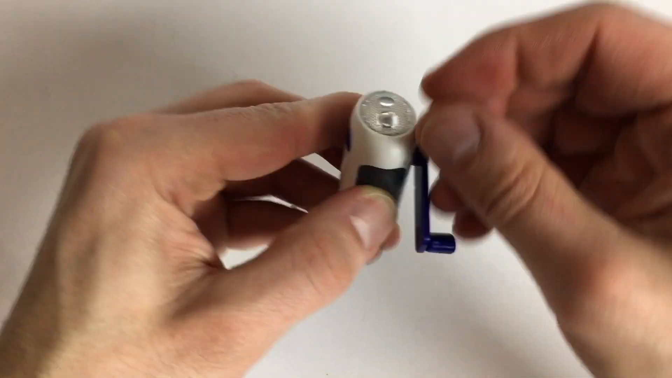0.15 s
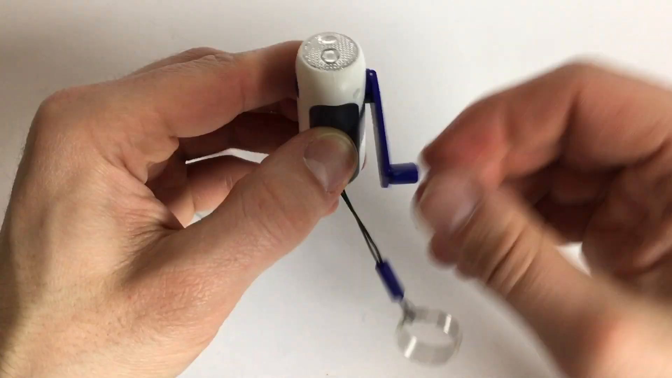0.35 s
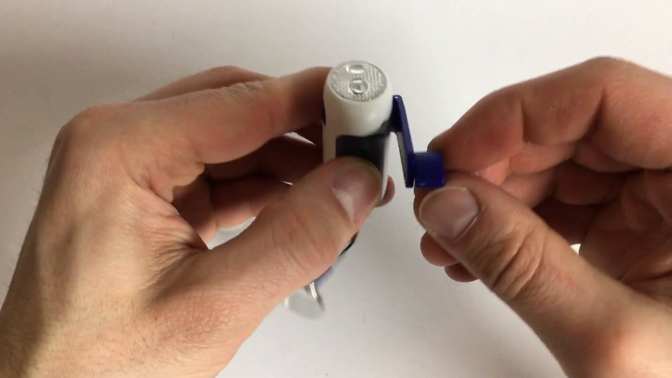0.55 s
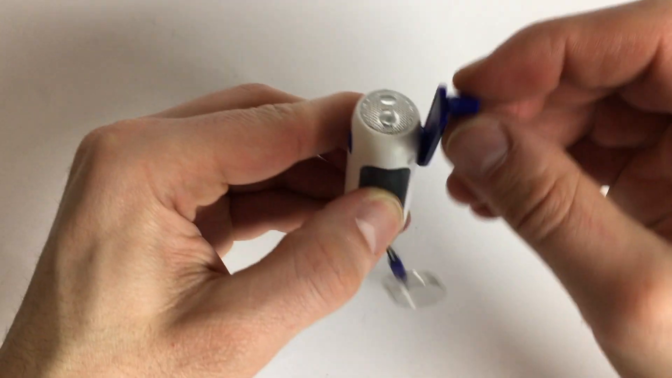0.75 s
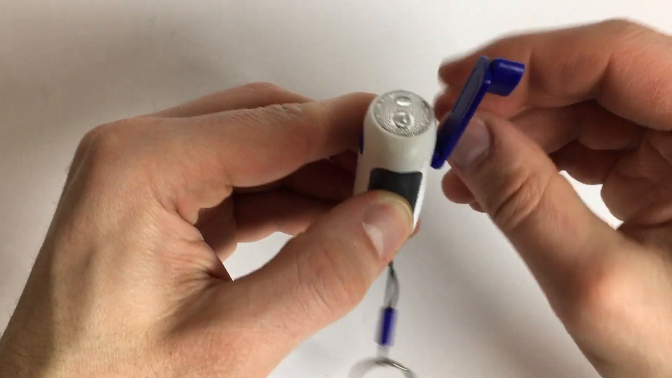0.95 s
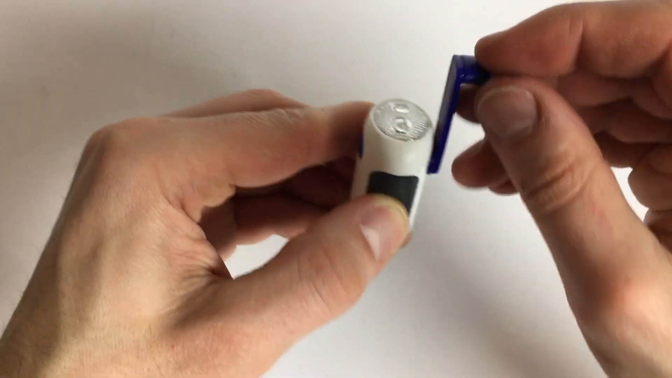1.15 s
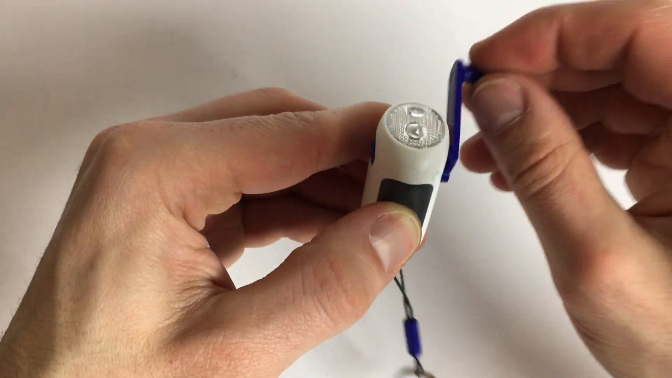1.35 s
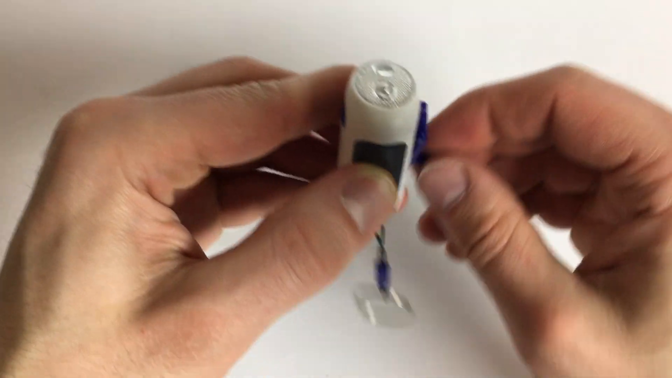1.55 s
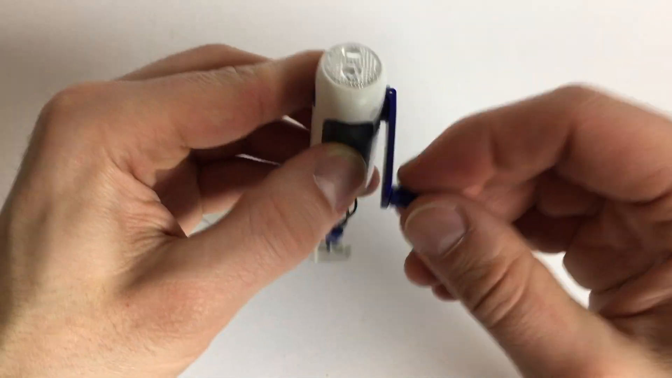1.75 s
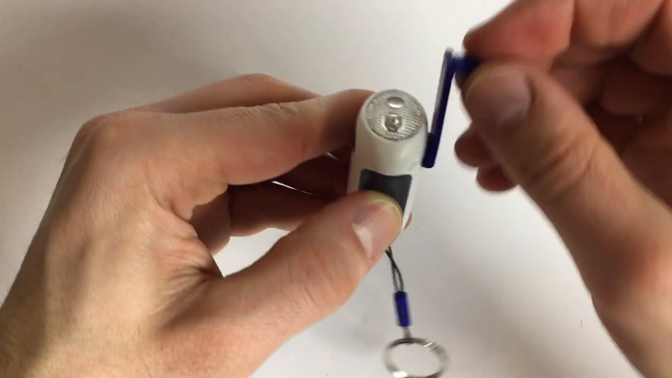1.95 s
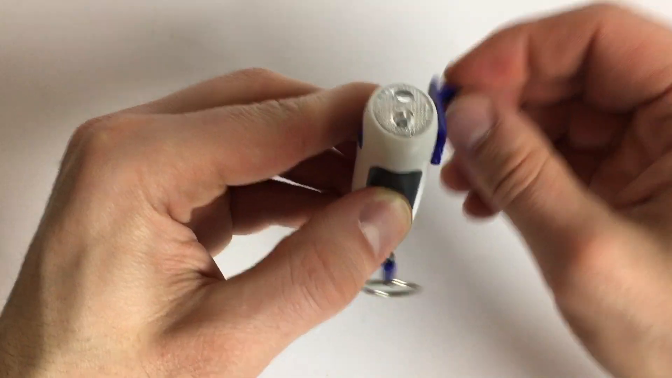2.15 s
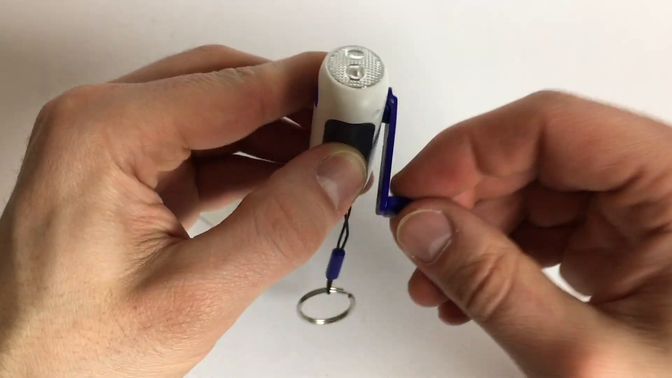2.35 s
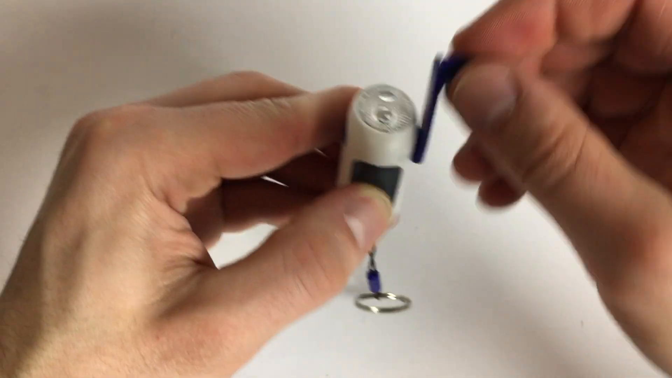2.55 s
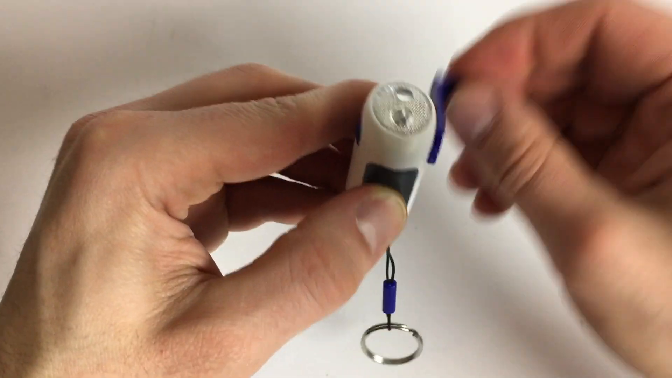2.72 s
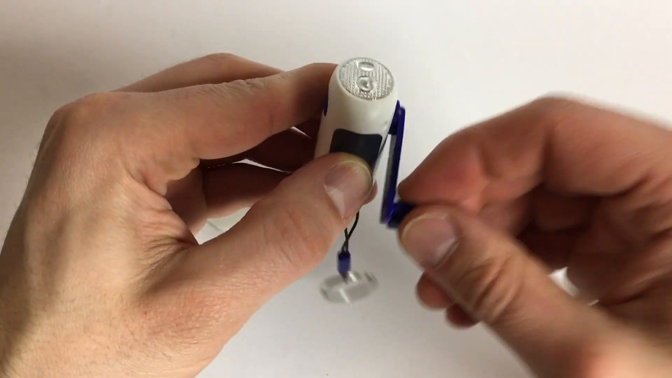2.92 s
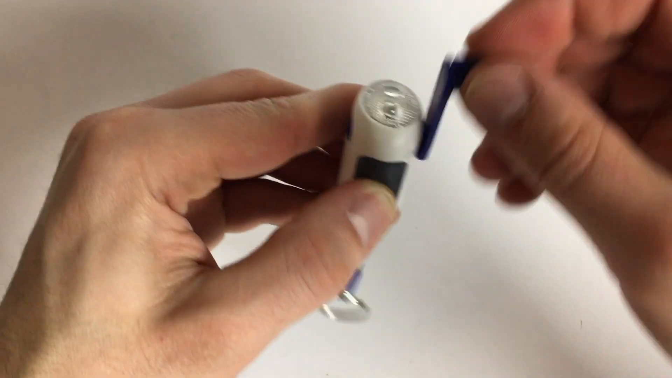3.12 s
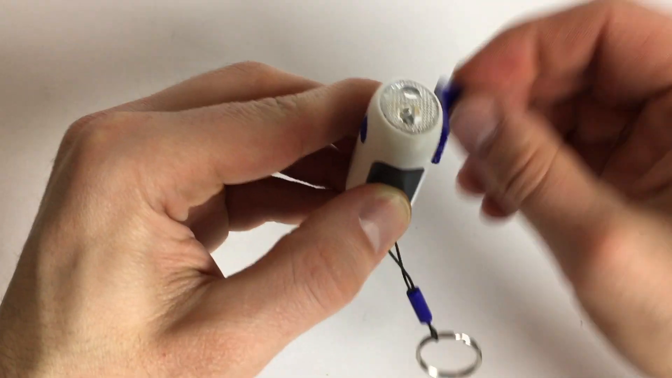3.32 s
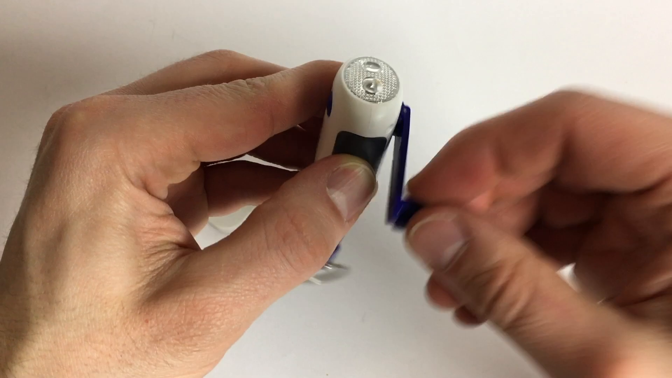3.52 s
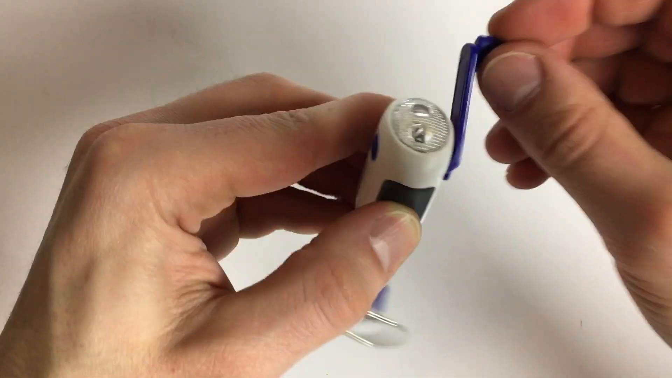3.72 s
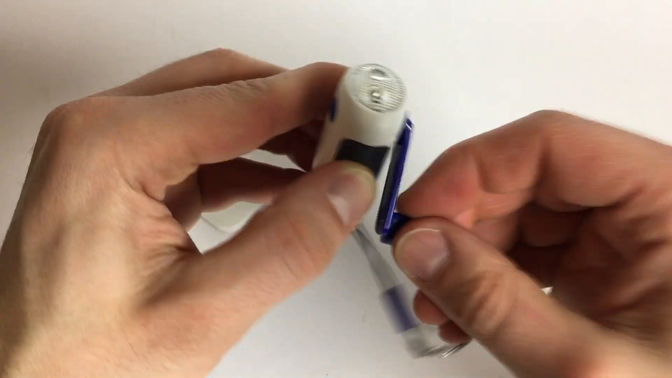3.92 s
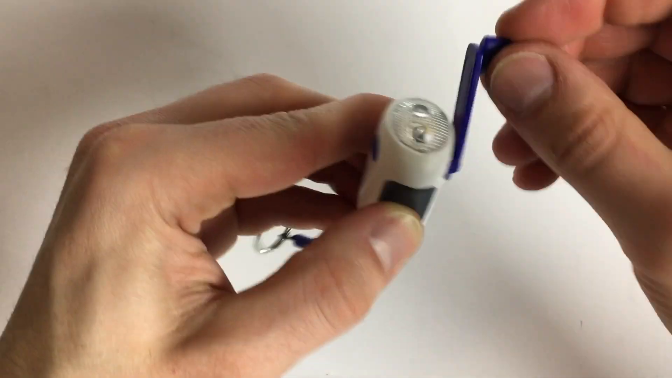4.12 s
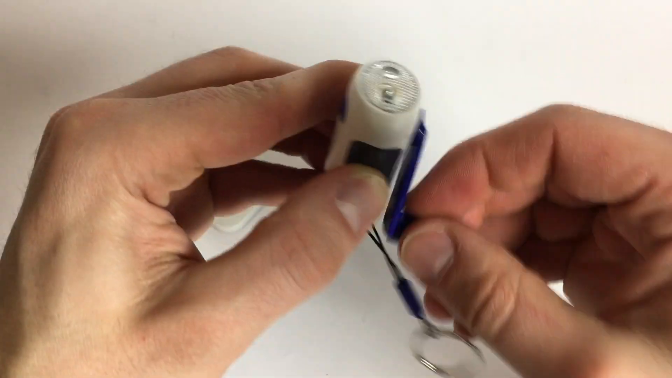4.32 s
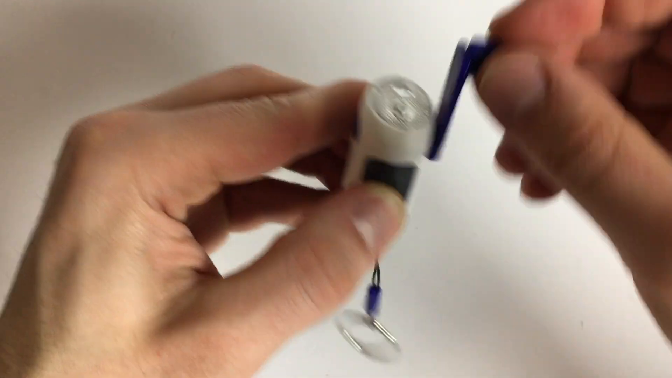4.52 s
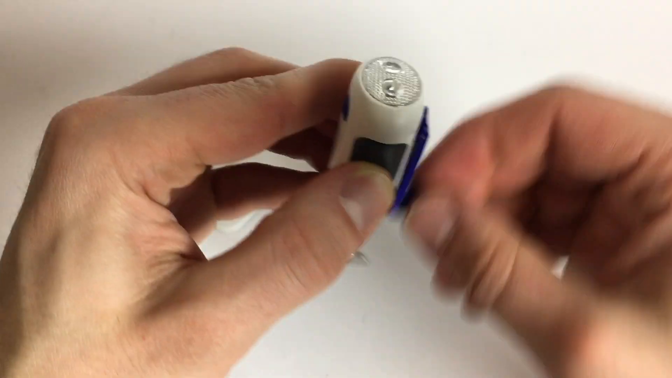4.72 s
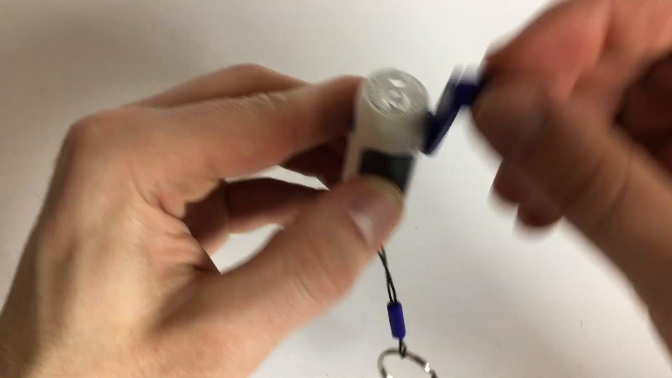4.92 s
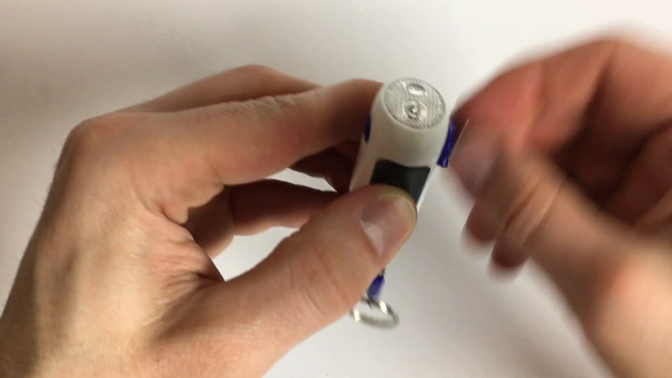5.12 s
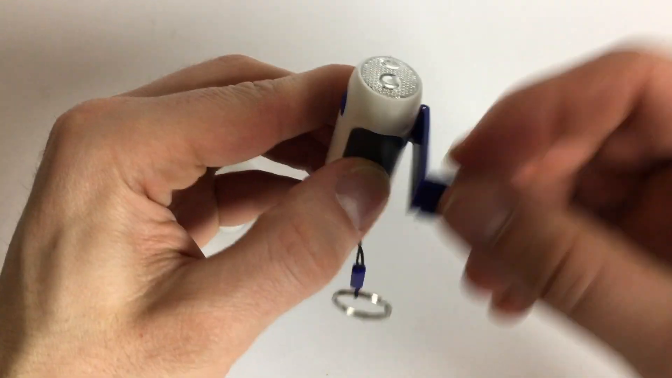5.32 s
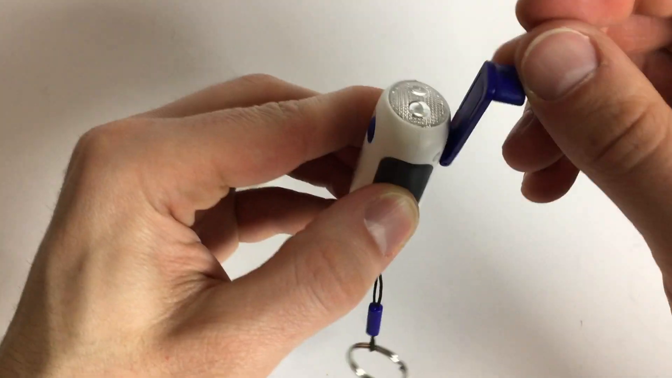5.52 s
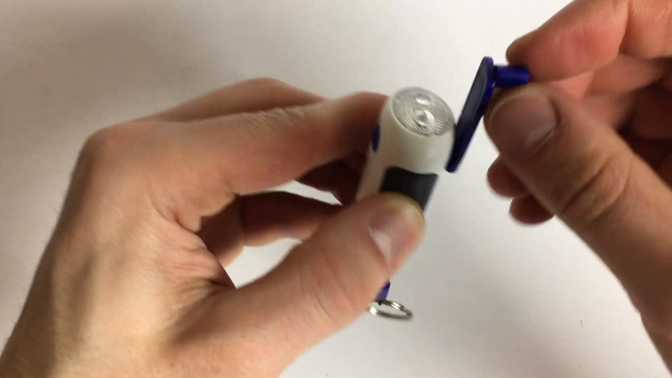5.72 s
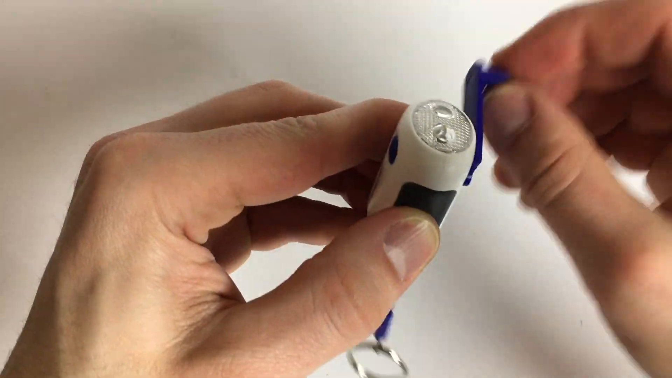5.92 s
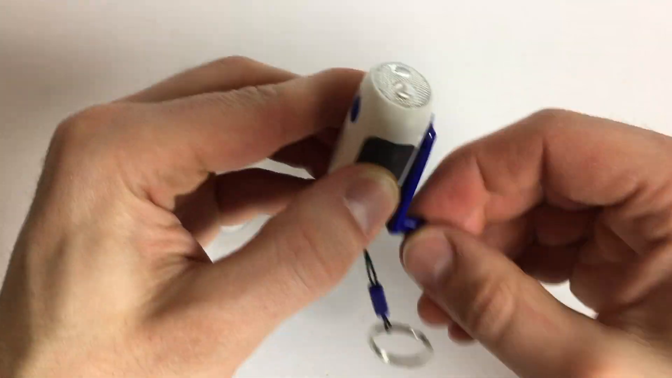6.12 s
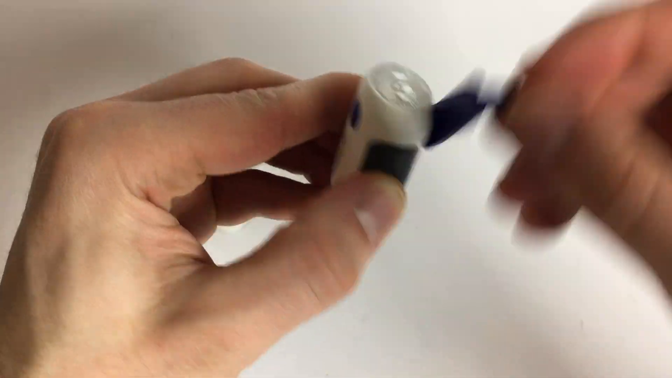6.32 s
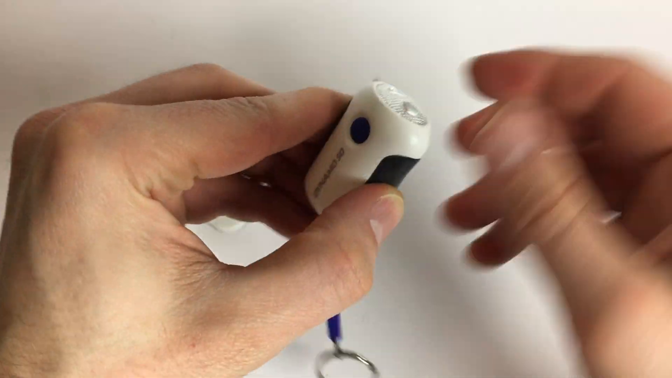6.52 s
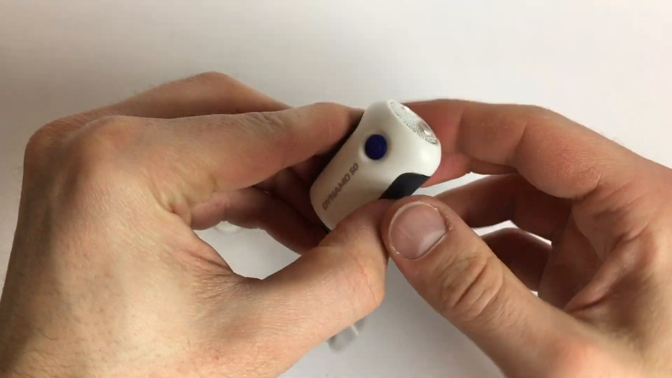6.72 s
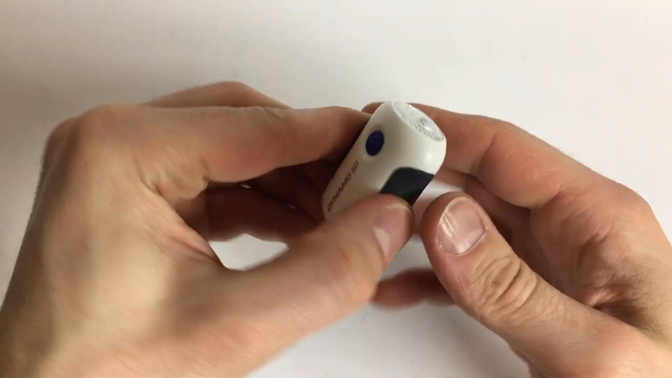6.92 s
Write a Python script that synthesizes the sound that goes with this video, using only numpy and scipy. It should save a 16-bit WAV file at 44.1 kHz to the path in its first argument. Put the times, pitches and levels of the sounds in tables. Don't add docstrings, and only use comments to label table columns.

```python
import sys
import numpy as np
from scipy import signal
from scipy.fft import rfft, irfft
from scipy.io import wavfile
from scipy.ndimage import uniform_filter1d, map_coordinates

SR = 44100
rng = np.random.default_rng(int(sys.argv[2]) if len(sys.argv) > 2 else 0)


def generate_wav(signal):
    frames = np.transpose(np.atleast_2d(signal))
    scaled = np.clip(frames, -1, 1) * 32767
    pcm = np.round(scaled).astype(np.int16)
    wavfile.write(sys.argv[1], SR, pcm)


def to_linear_factor(level_db):
    exponent = np.asarray(level_db, float) / 20
    return 10 ** exponent


N = 306936
TIME = np.arange(N) / SR

# pitch_hz, level_db
AIR_SPECTRUM = [(59, -36), (100, -5), (296, -7.5), (679, -12.5), (805, -11), (975, -16), (1060, -13),
                (1180, -13), (16200, -19)]
# time_s, level_db
AIR_LEVEL = [(0, -51), (2.6, -50.5), (3.2, -54.5), (4.3, -54.5), (4.8, -56.5), (5.04, -52.5), (5.7, -57),
             (6.96, -55.3)]
# start_s, hold_s, level_db
RUMBLE_SURGES = [(0, .1, -61), (.75, .15, -62), (1.05, .45, -59), (1.85, .2, -61), (4.0, .6, -63.5),
                 (5.04, .06, -60)]
# start_s, hold_s, level_db
PIPE_DRONES = [(.4, .3, -57.5), (1.65, .15, -63), (2.45, .15, -63), (3.55, .15, -64), (5.02, .35, -61),
               (6.13, .4, -62)]
# time_s, pitch_hz, level_db
HIGH_DRONES = [
    [(.38, 1193, -66), (.42, 1200, -55), (.5, 1204, -58), (.58, 1150, -70)],
    [(6.47, 1094, -68.5), (6.51, 1100, -59.5), (6.6, 1104, -67)],
]
RUMBLE_REST_DB, RUMBLE_PER_AIR_DB = -68, 1.1
SWELL_DB_PER_S, FADE_DB_PER_S = 90, 60

# peak_s, rattle_db, swell_s and sink_s (each per 10 dB)
PUSHES = [(0, -47, .1, .15), (.065, -42, .08, .065), (.115, -42, .03, .07), (.509, -35, .018, .03),
          (.564, -29.5, .038, .021), (.705, -27, .075, .055), (.818, -27, .063, .033),
          (1.199, -37, .003, .05), (1.22, -26, .012, .075), (1.345, -25, .035, .15),
          (1.376, -23.5, .03, .05), (1.43, -27, .004, .08), (1.464, -29, .005, .1),
          (1.517, -27, .02, .3), (1.57, -21.5, .13, .042), (1.636, -29, .004, .03),
          (1.647, -24, .008, .2), (1.68, -20.5, .04, .15), (1.931, -27, .5, .04),
          (2.025, -25, .13, .08), (2.098, -28, .006, .1), (2.125, -24.5, .03, .1),
          (2.28, -23, .6, .058), (2.362, -32, .009, .05), (2.38, -30, .01, .2), (2.479, -25, .14, .1),
          (2.624, -24, .055, .075), (2.749, -19, .105, .055), (2.82, -36, .02, .3),
          (2.89, -35, .006, .05), (2.915, -27.5, .005, .14), (3.028, -24.5, .08, .088),
          (3.158, -27, .09, .25), (3.382, -23, .25, .15), (3.425, -25, .1, .014),
          (3.454, -29, .004, .05), (3.475, -22, .02, .06), (3.607, -25.5, .058, .2),
          (3.667, -24, .4, .1), (3.759, -28.5, .01, .1),
          (3.868, -21.5, .16, .028), (3.92, -35.5, .02, .14), (3.998, -30, .012, .1),
               (4.021, -25, .033, .2), (4.081, -23.5, .9, .088), (4.24, -21.5, .08, .3),
               (4.29, -24.5, .1, .04), (4.36, -30.5, .02, .024), (4.43, -25, .021, .1),
               (4.5, -23.5, .45, .075), (4.674, -21, .1, .06), (4.794, -33.5, .2, .06),
               (4.843, -37, .004, .012), (4.868, -28, .004, .05), (4.915, -22, .05, .062),
               (5.011, -29, .004, .1), (5.15, -21.5, .17, .04), (5.23, -33.5, .02, .07),
               (5.297, -31, .005, .2), (5.408, -28, .2, .055), (5.51, -37, .006, .016),
               (5.57, -56, .05, .1), (5.786, -31, .014, .1), (5.817, -28, .075, .13),
               (5.902, -27.5, .1, .052), (6.001, -26, .05, .12), (6.069, -30, .004, .08),
               (6.104, -27, .006, .1), (6.14, -30, .05, .018), (6.18, -40, .02, .05),
               (6.213, -29, .012, .06), (6.305, -23.5, .12, .033), (6.348, -35, .006, .04),
               (6.425, -39, .02, .15), (6.455, -40, .06, .1), (6.49, -41.5, .9, .024),
               (6.525, -45, .037, .037)]
CREST_ROUNDING = 1.15
LET_GO_S = 6.35
# start_s, end_s, from_hz, to_hz, bend (under 1 early, over 1 late)
EARLY_PULLS = [(0.54, 0.58, 1193, 1453, 0.8), (0.66, 0.7, 1179, 1737, 0.57), (0.79, 0.85, 1332, 1630, 0.53),
               (1.208, 1.236, 1250, 1850, 0.95), (1.24, 1.275, 1870, 2000, 0.9),
               (1.33, 1.38, 1684, 2451, 1.04), (1.55, 1.6, 1230, 1314, 0.9), (1.67, 1.77, 1180, 1575, 0.75),
               (1.8, 1.95, 1590, 1400, 1.1), (1.96, 2.07, 1385, 1300, 0.7), (2.125, 2.28, 1250, 1807, 0.55),
               (2.42, 2.5, 1279, 1807, 1.1), (2.58, 2.72, 1570, 1821, 2.1), (2.72, 2.8, 1810, 2350, 0.6),
               (3.0, 3.07, 1205, 1636, 0.84), (3.11, 3.28, 1468, 1537, 0.87),
               (3.28, 3.42, 1555, 2050, 1.35), (3.45, 3.5, 1665, 1832, 1.48)]
# start_s, end_s, from_hz, to_hz, bend
LATE_PULLS = [(3.59, 3.7, 1504, 2522, 0.84), (3.78, 3.86, 2266, 2788, 1.97), (4.0, 4.11, 1441, 2669, 1.14),
              (4.21, 4.29, 2131, 2871, 0.98), (4.43, 4.53, 1132, 2612, 0.73), (4.62, 4.72, 2118, 2975, 1.5),
              (4.87, 4.95, 1273, 2430, 0.96), (5.05, 5.16, 1891, 2653, 2.15), (5.3, 5.46, 1280, 1443, 0.35),
              (5.785, 5.835, 1300, 2480, 0.6), (5.88, 5.93, 1186, 1518, 0.7),
              (5.98, 6.03, 1316, 1839, 1.05), (6.08, 6.16, 1629, 1825, 0.91),
              (6.21, 6.25, 1349, 1600, 1.78), (6.25, 6.32, 1637, 2991, 0.8)]
INERTIA_S = .012

# time_s, knocks_per_s
WHEEL_BOUNCE = [(0, 300), (.2, 300), (.5, 800), (1.38, 850), (1.45, 480), (5.15, 480), (5.22, 900),
                (5.7, 900), (5.8, 520), (6.96, 480)]
# time_s, top_ring_db
FACING_MICROPHONE = [(0, 5), (.3, 2), (1.3, .1), (1.6, 3.5), (1.8, .3), (2.25, 1.5), (2.6, -.5), (3.7, -.3),
                     (3.9, 1), (4.6, -1.8), (5.25, .3), (5.3, -3), (5.85, -1.5), (6.1, 4), (6.33, 2.5),
                     (6.42, -2)]
# pitch_hz, level_db
TOP_RING = [(9000, -60), (11000, -26), (12200, -11), (13700, -8), (14300, -4), (14900, 0), (15300, -1),
            (15700, -4), (16300, -30)]
# pitch_hz, level_db
SHELL_RING = [(1410, -29.5), (2400, -14), (2880, -14), (3500, -3.5), (4370, -3.5), (4800, -2.5), (5350, -4),
              (6200, -2), (7000, -6), (7640, -12), (8340, -7.5), (9350, -12), (11400, -10), (12000, -5.5),
              (15600, -38), (22000, -120)]
# pitch_hz, level_db
BODY_RING = [(470, -43), (800, -20.5), (863, -28), (1130, -24.5), (1610, -9.5), (1810, -6.5), (2110, 0.5),
             (2770, -7), (3200, -4), (4160, -26.5), (7040, -120)]
# pitch_hz, level_db
TOOTH_EDGE = [(5500, -40), (7200, -6), (8400, 0), (10000, -3), (11500, -2), (13000, -30)]
# pitch_hz, width_hz, lift_db
NARROW_MODES = [(2326, 42, 3.5), (3430, 210, 5.5), (3743, 54, 4), (4080, 68, 5.5), (4684, 160, 4.5),
                (5000, 77, 4), (6090, 103, 5), (6600, 180, 4.5), (7160, 120, 5.5), (7990, 110, 2.5),
                (8470, 110, 3.5)]
GRIP_SHIFT = .014
TOP_PER_LOAD, TOP_DB_PER_OCTAVE = .45, 2
EDGE_DB = -15.5

# time_s, level_db
HINGE_SLIPS = [(.0098, -36), (.0168, -39), (.0235, -38), (.0275, -41), (.031, -35), (.034, -38),
               (.0362, -35), (.039, -30), (.0424, -23), (.0462, -24), (.0493, -29), (.0543, -26),
               (.0586, -28), (.0646, -28), (.0678, -26), (.0708, -30), (.078, -39), (.0848, -36)]
# pitch_hz, level_db
CRANK_ARM = [(1200, -38), (2700, -15), (3900, 0), (5000, -10), (6300, -8), (8500, -10), (11000, -17),
             (13500, -1), (14500, -1), (15800, -14)]
# time_s, peak_db, top_db, low_db
TORCH_CLICKS = [(0.0953, -20.5, -9, -27), (0.1045, -21, 3, -40), (0.1089, -19, 0, -24),
                (0.137, -31, -21, -27), (0.341, -32, -2, -25), (0.3474, -37, -6, -28),
                (0.354, -37, -11, -32), (0.3646, -24.5, -1, -25), (0.3714, -47, -3, -27),
                (0.4015, -38, -17, -23), (0.447, -39, -15, -23), (0.4708, -43, -15, -22),
                (0.8948, -30.5, -15, -20), (0.9135, -32, -17, -16), (0.922, -24.5, -21, -14),
                (0.9946, -43, -12, -15), (1.042, -25.5, -1, -27), (1.0545, -35, -12, -18),
                (1.1471, -37, -2, -23), (1.173, -35.5, -16, -15),
                (2.912, -25, -10, -26), (4.866, -26, -6, -26), (5.008, -26, -8, -26),
                (1.634, -19.5, -8, -26), (3.452, -22, -10, -26), (4.42, -27, -8, -26),
                (5.299, -31, -6, -26), (6.068, -21, -4, -30), (6.21, -24, -6, -26), (1.2908, -35, -13, -14),
                (1.3039, -27, -12, -15.5), (1.4285, -18.5, -2.5, -21), (1.4624, -19.5, -13, -39),
                (2.8309, -27.5, -12, -32.5), (2.8518, -28.5, -15, -26), (3.9796, -41, -16, -24),
                (4.8415, -26, -7, -26), (5.633, -42, -22.5, -14.5), (5.7455, -39.5, -13, -18.5),
                (6.1017, -18.5, -12, -43.5), (6.6347, -46, -9, -15), (6.456, -33, -8, -24),
                (6.484, -35, -12, -24), (6.521, -42, -15, -20), (6.531, -41, -12, -20),
                (6.6424, -30, -5, -25), (6.7147, -33, -14, -19), (6.773, -37, -8, -24),
                (6.84, -38, -7, -25), (6.86, -43, -17, -17), (6.873, -38, -22, -29),
                (6.9252, -39, -18, -24)]
# time_s, level_db, pitch_hz
ARM_THUMP = (0.104, -31, 140)
# time_s, level_db
KEY_KNOCKS = [(.109, -36), (.365, -42), (1.0425, -33), (1.148, -47), (6.6425, -39), (6.715, -48),
              (6.773, -46), (6.84, -49)]
# pitch_hz, level_db, t60_s
STEEL_MODES = [(6900, -5, .07), (7600, -5, .035), (9238, -3, .07), (10620, -3, .04), (12040, -5, .04),
               (13600, -2, .1), (13900, -4, .16), (14220, -2, .1)]
# time_s, level_db
CORD_RUBS = [
    [(.12, -52), (.15, -54), (.19, -62)],
    [(6.43, -58), (6.5, -53), (6.56, -55), (6.62, -65)],
]

# pitch_hz, level_db over the rattle
SHELL_RADIATION = [(600, -38), (1000, -29), (1300, -24.5), (1600, -20.5), (2050, -11.5), (2500, -15.5),
                   (3000, -15), (4000, -15), (5000, -17), (8000, -28)]
# multiple of half the mesh pitch, level_db
WHINE_PARTIALS = [(1, -20), (2, 0.3), (3, -16), (4, -5), (5, -14), (6, -10)]
COAST_DB_PER_S = 70
STRAIN_DB, HARD_HZ_PER_S = 3.5, 14000
UNEVEN_DB, SETTLE_S, SLOW_HZ, SPURT_HZ_PER_S = 17, .055, 1500, 6000
# pitch_hz, t60_s
WALL_DECAY = [
    (1000, 0.12),
    (5000, 0.16),
    (15000, 0.06),
]


def unit(x):
    return x / np.sqrt(np.mean(x ** 2) + 1e-20)


def steady(x):
    return x / np.sqrt(np.abs(uniform_filter1d(x ** 2, size=SR // 16)) + 1e-12)


def along(points, hz):
    f, value = np.transpose(points)
    return np.interp(np.log(hz + 1), np.log(f + 1), value)


def curves(tables):
    s, *columns = np.concatenate(tables).T
    return [np.interp(TIME, s, column) for column in columns]


def gate(tables, fade_s):
    on = sum((TIME >= rows[0][0]) & (TIME <= rows[-1][0]) for rows in tables) > 0
    return uniform_filter1d(on.astype(float), size=int(fade_s * SR) + 1)


def wobble(rate):
    return map_coordinates(rng.standard_normal(int(N * rate / SR) + 4), [TIME * rate])


def coloured(x, spectrum):
    gain = to_linear_factor(along(spectrum, np.fft.rfftfreq(4096, 1 / SR)))
    cepstrum = irfft(np.log(gain + 1e-3))
    cepstrum[1:2048] *= 2
    cepstrum[2049:] = 0
    ring = irfft(np.exp(rfft(cepstrum)))
    return signal.fftconvolve(x, ring / np.linalg.norm(ring))[:N]


def bursts(strikes, t60):
    t = np.arange(SR // 50) / SR
    shape = to_linear_factor(-60 * t / t60) * (1 - np.exp(-t / .0003))
    power = np.abs(signal.fftconvolve(strikes ** 2, shape ** 2)[:N])
    return rng.standard_normal(N) * np.sqrt(power)


def swells(rows):
    s, hold, db = np.transpose(rows)[..., None]
    swell_db = SWELL_DB_PER_S * np.maximum(s - TIME, 0)
    fade_db = FADE_DB_PER_S * np.maximum(TIME - s - hold, 0)
    return np.max(db - swell_db - fade_db, axis=0)


def room():
    def noise(spectrum):
        return unit(coloured(rng.standard_normal(N), spectrum))

    def pipe(hz):
        return to_linear_factor(3.2 * wobble(60)) * np.sin(2 * np.pi * np.cumsum(hz) / SR)

    air_db, = curves([AIR_LEVEL])
    rumble_db = np.maximum(RUMBLE_REST_DB + RUMBLE_PER_AIR_DB * (air_db + 54), swells(RUMBLE_SURGES))
    air = to_linear_factor(air_db) * noise(AIR_SPECTRUM)
    rumble = to_linear_factor(rumble_db) * noise([(20, -19.5), (52, 1.5), (110, -8), (300, -46)])
    drone = to_linear_factor(swells(PIPE_DRONES)) * pipe(390 + 28 * wobble(70))
    high_hz, high_db = curves(HIGH_DRONES)
    high = gate(HIGH_DRONES, fade_s=.03) * to_linear_factor(high_db) * pipe(high_hz + 22 * wobble(40))
    return air + rumble + drone + high


def load():
    s, db, swell, sink = np.transpose(PUSHES)

    def slope(push, span):
        return db[push] - 10 * (np.abs(TIME - s[push]) / span[push]) ** CREST_ROUNDING

    k = np.searchsorted(s, TIME)
    last, coming = np.maximum(k - 1, 0), np.minimum(k, len(s) - 1)
    swelling = np.where(k < len(s), slope(coming, swell), -120)
    return np.maximum(np.maximum(slope(last, sink), swelling), -120)


def mesh():
    u = np.linspace(0, 1, num=12)
    pulls = [np.c_[start + (end - start) * u, from_hz + (to_hz - from_hz) * u ** bend]
             for start, end, from_hz, to_hz, bend in EARLY_PULLS + LATE_PULLS]
    return uniform_filter1d(curves(pulls)[0], size=int(INERTIA_S * SR))


def teeth(rate, mesh_hz, jitter, scatter_db):
    skip = np.maximum(np.round(mesh_hz / rate * (1 + .15 * wobble(25))), 1)
    landings = np.cumsum(mesh_hz / skip) / SR
    luck = rng.standard_normal((int(landings[-1]), 2))
    at = np.searchsorted(landings, np.arange(len(luck)) + .5)
    ragged = jitter * to_linear_factor(8 * wobble(7))[at] * SR * skip[at] / mesh_hz[at]
    at = np.clip(at + np.round(ragged * luck[:, 0]).astype(int), 0, N - 1)
    wheel = np.sin(2 * np.pi * np.cumsum(mesh_hz / 22) / SR)
    strikes = np.zeros(N)
    strikes[at] = to_linear_factor(scatter_db * np.clip(luck[:, 1], -2, 2) + 1.3 * wheel[at])
    return strikes


def resonant(x):
    both = []
    for shift in (1 - GRIP_SHIFT, 1 + GRIP_SHIFT):
        y = x
        for hz, width_hz, db in NARROW_MODES:
            b, a = signal.iirpeak(hz * shift, hz / width_hz, SR)
            y = y + (to_linear_factor(db) - 1) * signal.lfilter(b, a, y)
        both.append(y)
    grip = .5 + .5 * np.tanh(2 * wobble(6))
    return grip * both[0] + (1 - grip) * both[1]


def hands(x):
    def late(delay_s, sway):
        return np.interp(TIME - delay_s * (1 + sway * wobble(3)), TIME, x)

    return x + 0.32 * late(0.000208, 0.06) - 0.32 * late(0.000898, 0.11)


def gears():
    rattle_db, mesh_hz = load(), mesh()
    effort = np.clip(to_linear_factor(.45 * (rattle_db + 27)), .3, 1.1)
    knocks = teeth(curves([WHEEL_BOUNCE])[0] * effort, mesh_hz, jitter=.06, scatter_db=1.9)
    rubbing = effort + 1.1 * (TIME > LET_GO_S) + 3 * (TIME < .3)

    def scrape(share):
        return share * rubbing * rng.standard_normal(N) * to_linear_factor(2.5 * wobble(30))

    clean = .8 * steady(knocks)
    top = steady(coloured(steady(bursts(knocks, t60=.0045)) + scrape(.52), TOP_RING))
    shell = resonant(coloured(clean + steady(bursts(knocks, t60=.005)) + scrape(.5), SHELL_RING))
    body = resonant(coloured(clean + steady(bursts(knocks, t60=.007)) + scrape(.8), BODY_RING))
    edge = steady(coloured(bursts(knocks ** 2, t60=.003), TOOTH_EDGE))

    top_db = curves([FACING_MICROPHONE])[0] + TOP_PER_LOAD * np.clip(rattle_db + 27, -25, 0)
    top_db = top_db + TOP_DB_PER_OCTAVE * np.log2(mesh_hz / 1800)
    body_db = -12.5 - 0.24 * (rattle_db + 25.5)
    layers = to_linear_factor(0.2) * steady(hands(shell)) + to_linear_factor(top_db) * top
    layers = layers + to_linear_factor(body_db) * steady(body) + to_linear_factor(EDGE_DB) * edge
    return to_linear_factor(rattle_db) * layers


def hinge():
    slips = np.zeros(N)
    s, db = np.transpose(HINGE_SLIPS)
    slips[np.round(s * SR).astype(int)] = to_linear_factor(db + 9.5)
    return coloured(bursts(slips, t60=.008), CRANK_ARM)


def clicks():
    t = np.arange(SR // 10) / SR
    crack, rustle = to_linear_factor(-60 * t / 0.013), 0.33 * to_linear_factor(-60 * t / 0.055)
    shape = (crack + rustle) * (1 - np.exp(-t / 0.00022))
    drive = np.zeros((3, N + SR))
    for s, db, top_db, low_db in TORCH_CLICKS:
        levels = to_linear_factor(db + np.array([[-6], [top_db - 2.0], [low_db + 7]]))
        start = round(s * SR)
        drive[:, start:start + len(t)] += levels * shape * rng.standard_normal((3, len(t)))
    parts = sum(coloured(d[:N], part) for d, part in zip(drive, (SHELL_RING, TOP_RING, BODY_RING)))
    return resonant(parts) + to_linear_factor(-5) * coloured(drive[0, :N], TOOTH_EDGE)


def thump():
    s, db, hz = ARM_THUMP
    u = np.maximum(TIME - s, 0) * 2 * np.pi * hz
    return to_linear_factor(db) * (1 - u) * np.exp(-u) * (TIME > s)


def key_ring():
    out, t = np.zeros(N + SR), np.arange(SR // 5) / SR
    for s, db in KEY_KNOCKS:
        ring = 0
        for hz, level_db, t60 in STEEL_MODES:
            decay = to_linear_factor(level_db + rng.normal(0, 3) - 60 * t / t60)
            rough_hz = hz + 900 * rng.standard_normal(len(t))
            ring = ring + decay * np.sin(2 * np.pi * np.cumsum(rough_hz) / SR)
        out[round(s * SR):][:len(t)] += to_linear_factor(db) * ring * (1 - np.exp(-t / .0004))
    return out[:N]


def cord():
    spectrum = [(7500, -30), (9000, -5), (9400, 0), (9800, -5), (11500, -30)]
    hiss = unit(coloured(rng.standard_normal(N), spectrum))
    return gate(CORD_RUBS, fade_s=.02) * to_linear_factor(curves(CORD_RUBS)[0]) * hiss


def pinion():
    hz = mesh()
    phase = np.pi * np.cumsum(hz * (1 + .007 * wobble(150))) / SR
    start, end, from_hz, to_hz = np.transpose(EARLY_PULLS + LATE_PULLS)[:4]
    pull = np.maximum(np.searchsorted(start, TIME) - 1, 0)

    slow = np.clip((SLOW_HZ - from_hz) / 150, 0, 1)
    spurt = slow * np.clip((to_hz - from_hz) / (end - start) / SPURT_HZ_PER_S, 0, 1.15)
    uneven_db = UNEVEN_DB * np.exp(-((TIME - start[pull]) / SETTLE_S) ** 2) * spurt[pull]
    tone = 0
    for k, db in np.round(WHINE_PARTIALS, 0):
        partial_db = db + k % 2 * uneven_db + along(SHELL_RADIATION, k * hz / 2) + 1.8 * wobble(40)
        tone = tone + to_linear_factor(partial_db) * np.sin(k * phase)

    coast_db = -COAST_DB_PER_S * np.maximum(TIME - end[pull], 0) - 60 * (TIME < start[0])
    strain_db = STRAIN_DB * np.clip(np.gradient(hz) * SR / HARD_HZ_PER_S, -.6, 1)
    return to_linear_factor(load() + strain_db + uniform_filter1d(coast_db, size=SR // 100)) * tone


def walls(x):
    hz, t, z = signal.stft(rng.standard_normal(SR // 2), SR, nperseg=256)
    decay = to_linear_factor(-60 * t / along(WALL_DECAY, hz)[:, None])
    tail = signal.istft(z * decay, SR, nperseg=256)[1]
    return signal.fftconvolve(np.pad(x, (150, 0)), tail / np.linalg.norm(tail))[:N]


def scene():
    torch = gears() + hinge() + clicks() + thump() + key_ring() + cord() + pinion()
    return (torch + to_linear_factor(-14) * walls(torch) + room())[None]


def roll_off(x):
    return signal.sosfilt(signal.butter(12, 16820, fs=SR, output="sos"), x)


def record(dry):
    kept = rfft(dry) * (np.fft.rfftfreq(N, 1 / SR) < 15780)
    mix = irfft(kept, N)
    return roll_off(mix)


dry = scene()
out = record(dry)
generate_wav(out)
```